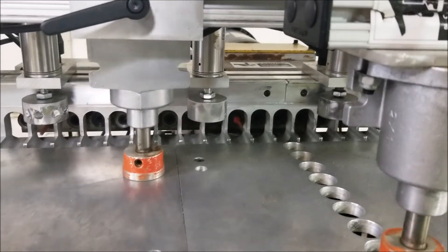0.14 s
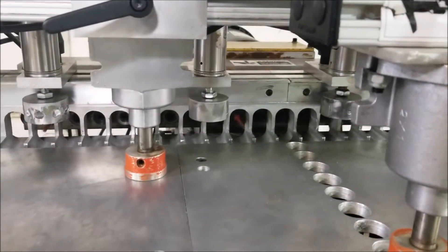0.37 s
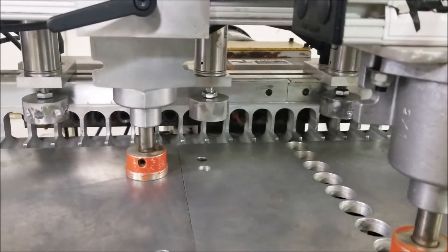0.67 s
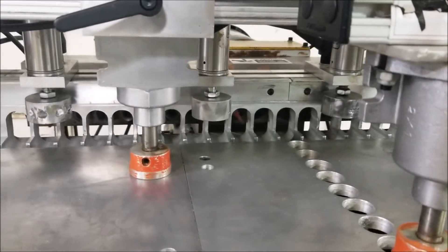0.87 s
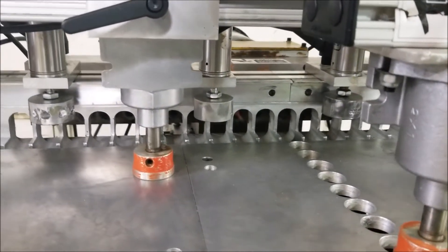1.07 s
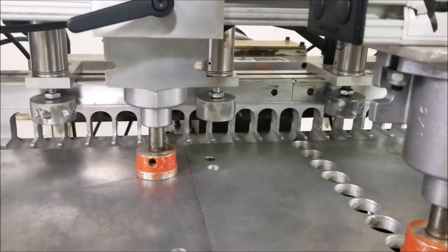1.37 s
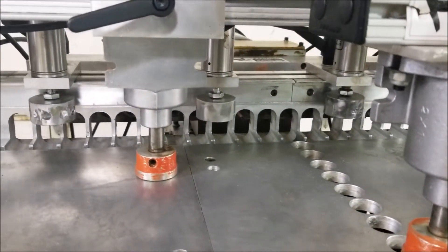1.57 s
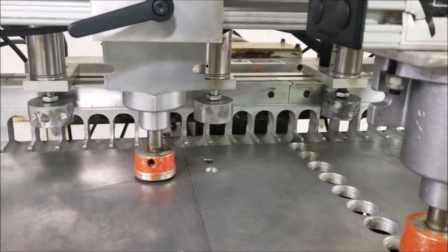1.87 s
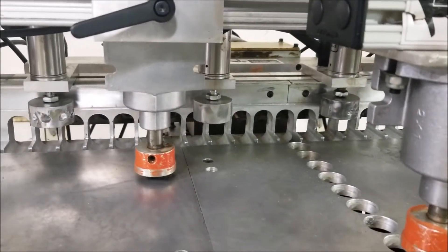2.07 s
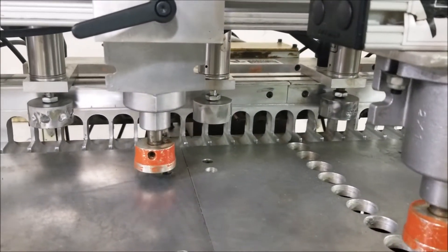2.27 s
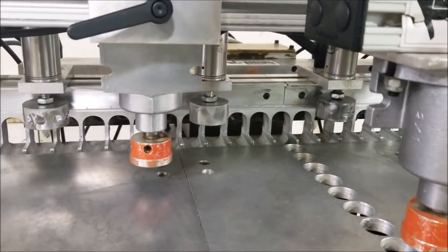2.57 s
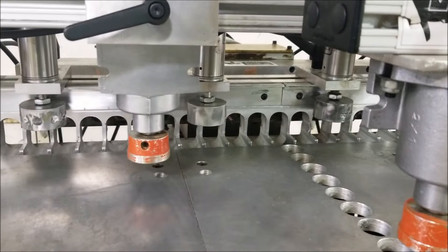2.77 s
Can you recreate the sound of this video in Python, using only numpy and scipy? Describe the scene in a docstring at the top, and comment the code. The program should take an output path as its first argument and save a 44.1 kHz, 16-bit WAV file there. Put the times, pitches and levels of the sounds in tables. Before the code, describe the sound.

Drilling machine roar cuts off with a dull thud, leaving motor hum, fan rush and clicking clamps

```python
"""A boring machine roars under load in a hard-walled workshop, on a left and a right microphone: noise that
partly repeats with the shaft, plus shaft orders. An air jet (coloured noise) and thin metallic chirps (bursts
of narrow noise) lie to the right. The load ends, the roar dies away over a dull thud, the casing rings on
and a wavering motor hum remains over the rush of fans. A valve clicks and a cylinder vents a short hiss
(shaped noise); the clamps knock as they move (damped rings with reflections off the machine's frame)."""
import sys
import numpy as np
from scipy import signal
from scipy.fft import rfft, irfft
from scipy.io import wavfile

SR = 44100
rng = np.random.default_rng(int(sys.argv[2]) if len(sys.argv) > 2 else 0)


def pcm_store(signal):
    """Save signal as 16-bit PCM."""
    levels = np.round(np.clip(np.atleast_2d(signal), -1, 1) * 32767)
    wavfile.write(sys.argv[1], SR, levels.astype(np.int16).T)


N = 129654
TIME = np.arange(N) / SR
BINS = np.maximum(np.arange(N // 2 + 1) * SR / N, 1)  # Hz

# In every table balance_db is left minus right, and density_db (per Hz) gives only the spectrum's shape.

# Roar of the loaded machine
SHAFT_HZ = 29.66  # turns per second
SPEED_WANDER, SPEED_WANDER_HZ = 0.001196, 2.06  # spread as a share of the speed; rate
REPEATING_SHARE = 0.44  # of the roar's noise power, alike every second turn
RIPPLE_DB, RIPPLE_HZ = 1.0, 23  # unevenness of the load
ROAR_LEFT_LATE_S = 0.00014  # the roar reaches the right microphone first
# level of the roar: time_s, level_db
ROAR_LEVEL = [(0, -27.5), (.4, -26.5), (.68, -24.5), (1.05, -24), (1.23, -23.5), (1.38, -28), (1.52, -35),
              (1.65, -48.5), (2.3, -90)]
# colour of the roar: pitch_hz, density_db
ROAR_COLOUR = [(25, -24), (50, -7), (130, -4.5), (240, -5.5), (400, -2.5), (500, -3.5), (680, 4), (840, 1),
               (950, -4), (1250, -4.5), (1700, -1.5), (2300, -6.5), (2900, -13), (3600, -7.5), (5000, -21),
               (7500, -23.5), (9000, -23.5), (16000, -28)]
# direction of the roar: pitch_hz, balance_db
ROAR_DIRECTION = [(100, 3), (300, -8), (500, 0.5), (770, -3), (1170, -2.5), (1790, 5), (3600, 5),
                  (6000, -12.5)]
# strong shaft orders: multiple (of the shaft rate, rounded), level_db (against the roar's noise), balance_db
SHAFT_ORDERS = [(6, -18.5, 5), (10, -17.5, 3), (12, -19.5, -2), (13, -13.5, 1.5), (15, -17.5, -6),
                (16, -16, -6), (18, -15, -4), (21, -16, -10), (24, -16, -2), (26, -12.5, -4),
                (29, -11, -1.5), (36, -17, -4), (48, -14, 7.5), (54, -20, 11), (63.87, -15.5, 18)]
ORDER_FLUTTER, FLUTTER_HZ = 1.1, 9.3  # flutter against the steady partial; rate
# drone at three times the shaft rate: time_s, level_db
DRONE_LEVEL = [(0, -52), (.16, -37.5), (.6, -32.5), (1.1, -32.5), (1.3, -36.5), (1.45, -47), (2, -98)]

# moments when the load grabs and one order booms: peak_s, level_db, multiple (of the shaft rate)
LOAD_SURGES = [(.53, -30.5, 13), (.66, -29.5, 24), (.73, -34.5, 21), (.93, -39, 13), (1.23, -36, 26),
               (1.29, -35.5, 10)]
SURGE_S = 0.035  # standard deviation of the swell

# casing resonances: pitch_hz, width_hz, level_db
CASING_MODES = [(1760, 140, -43.5), (3630, 260, -49.5)]
RING_OUT_S, RING_T60_S = 1.39, 2.24

# level of the air jet: time_s, level_db
JET_LEVEL = [(0, -21), (.04, -24.5), (.16, -30), (.35, -33), (1.18, -36), (1.27, -33.5), (1.38, -39),
             (1.55, -41), (1.75, -49), (2, -56.5), (2.4, -83)]
# colour of the air jet: pitch_hz, density_db
JET_SPECTRUM = [(500, -41), (1500, 0.5), (2400, 9), (3200, 4), (5000, 1), (7600, 0.5), (8500, -7),
                (9800, -1), (12000, -2), (13400, 0), (14100, -7), (15500, -11.5)]
# thin hiss that lingers as the roar dies: time_s, level_db
LAST_AIR_LEVEL = [(1.3, -75), (1.45, -49), (1.62, -43), (1.8, -66), (2.1, -90)]
# colour of that hiss: pitch_hz, density_db
LAST_AIR_SPECTRUM = [(4000, -21), (11000, -3), (15000, -1)]
# direction of all escaping air: pitch_hz, balance_db
AIR_DIRECTION = [(2500, -2), (4500, 0.5), (6500, -7), (8100, -42), (9800, -11.5), (13300, -5.5),
                 (14500, -14)]
JET_TAIL_T60_S, JET_TAIL_DB = 0.068, -7.5  # short, dense noise tail that smears the jet's hiss

# Chirps: centre and width of the band, standard deviation of the swell
CHIRP_HZ, CHIRP_WIDTH_HZ, CHIRP_S = 13330, 400, 0.0014
CHIRP_DB, CHIRP_SPREAD_DB, CHIRP_PAN_DB = -17.5, 3.5, -14  # first is against the roar's level
# the loudest chirps: peak_s, level_db
LOUD_CHIRPS = [(1.172, -32), (1.239, -34), (1.42, -31)]

# clamp knocks: start_s, clack_db (before the clamp band), clack_hz, body_db, clack balance_db, left_late_s
CLAMP_KNOCKS = [(2.2496, -26.5, 1300, -30.5, -5, .00022), (2.358, -26.5, 1330, -34, -2, 0.0012),
                (2.405, -29, 1280, -42, -7, 0.00078), (2.4556, -13, 1180, -37, -4, 0),
                (2.5738, -25.5, 1540, -34, -4, 0.0047), (2.7301, -18, 1390, -25, 11, 0.00045)]
CLACK_T60_S, BODY_HZ, BODY_T60_S = 0.0081, 555, 0.043
KNOCK_LOW_HZ, KNOCK_HIGH_HZ = 795, 1880  # band that the clamps radiate
KNOCK_FRAME_DB, KNOCK_FRAME_T60_S = -5.5, 0.08  # reflections off the machine's frame

# Dull thud as the load ends
THUD_S, THUD_DB, THUD_T60_S = 1.277, -26, 0.13
# colour of the thud: pitch_hz, density_db
THUD_SPECTRUM = [(30, -19), (90, 9), (600, -2), (5000, -55)]

# Cylinder vent: opens, peaks, shuts
VENT_START_S, VENT_PEAK_S, VENT_DB = 2.252, 2.4, -40.5
VENT_RISE_DB_PER_S, VENT_FALL_DB_PER_S = 40, 185
# colour of the vent and the valve: pitch_hz, density_db
VENT_SPECTRUM = [(300, 7), (1500, 6.5), (3000, 2), (6500, -1), (9000, -3.5), (12000, 0.5), (16000, 1)]
# valve clicks: start_s, level_db
VALVE_SPITS = [(2.2492, -30.5), (2.389, -36)]
VALVE_T60_S = 0.018

# main idle tone, which swells and dips: time_s, level_db
WHINE_SWELL = [(0, -50), (1.38, -38.5), (1.53, -35.5), (1.62, -44.5), (1.7, -33), (1.8, -43.5), (1.93, -34),
               (2.03, -43.5), (2.12, -38.5), (2.39, -35.5), (2.42, -43), (2.47, -36.5), (2.7, -34),
               (2.85, -39), (2.94, -32.5)]
WHINE_HZ, WHINE_PAN_DB, WHINE_FLUTTER = 356.2, -8, 0.13
# low idle tone: time_s, level_db
LOW_HUM_SWELL = [(0, -46.5), (1.6, -52), (1.93, -44), (2.04, -45), (2.22, -39), (2.36, -45.5),
                 (2.94, -45.5)]
LOW_HUM_HZ, LOW_HUM_FLUTTER = 140, 0.17
# weaker idle tones: pitch_hz, level_db (before IDLE_SWELL), balance_db, flutter (against the steady partial)
WEAK_HUM = [(279, -47, -4.5, 0.57), (640, -55.5, 8, 0.45), (707, -54.5, -30, 0.48)]
HUM_FLUTTER_HZ = 3.1
# swell shared by the weak tones and the fans: time_s, gain_db
IDLE_SWELL = [(0, -9.5), (1.6, 0), (2.05, -1.5), (2.3, -0.5), (2.6, 1), (2.94, 1)]
FANS_DB = -37  # before IDLE_SWELL
# colour of the fans: pitch_hz, density_db
FANS_COLOUR = [(20, -24), (45, 1.5), (80, 2), (200, -0.5), (350, 1.5), (430, -6.5), (650, -9), (850, -13),
               (1400, -13), (2200, -16), (4200, -19.5), (5200, -27), (7500, -28.5), (9200, -36.5),
               (12500, -35.5), (16000, -35)]
# direction of the fans and the thud: pitch_hz, balance_db
IDLE_DIRECTION = [(100, 1.5), (400, -4), (1000, -2), (2800, 2.5), (4500, 1.5), (8000, -15), (13000, -6)]

# likeness of the left and right microphone signals: pitch_hz, likeness (1 is identical)
MIC_LIKENESS = [(80, 0.96), (200, 0.95), (400, 0.93), (780, 0.53), (1100, 0.043), (3000, 0.013)]
CUTOFF_HZ = 15850


def from_db(db):
    """Decibels to gain."""
    return 10 ** (np.asarray(db) / 20)


def rms_one(x):
    """Scale to unit power."""
    return x / np.sqrt(np.mean(x ** 2) + 1e-20)


def level(rows):
    """Gain over time from time_s, level_db points."""
    return from_db(np.interp(TIME, *np.transpose(rows)))


def over_hz(points):
    """Join pitch_hz, value points on a log-frequency axis."""
    hz, value = np.transpose(points)
    return np.interp(np.log(BINS), np.log(hz), value)


def pan(db):
    """Left and right gains of constant power."""
    gains = from_db(np.array([[.5], [-.5]]) * db)
    return gains / np.sqrt(np.mean(gains ** 2, axis=0))


def drift(rate):
    """Slow chance with spread 1: noise through a double low-pass at the rate in Hz."""
    r = np.exp(-200 * np.pi * rate / SR)
    # one value per 100 samples; the first 1000 let the filter settle
    steps = rng.standard_normal(N // 100 + 1002)
    slow = signal.lfilter([1], [1, -2 * r, r * r], steps)[1000:]
    return np.interp(np.arange(N) / 100, np.arange(len(slow)), rms_one(slow))


def white():
    """Two unrelated noises."""
    return rng.standard_normal((2, N))


def coloured(source, colour, balance):
    """Give two unrelated signals a spectrum, a likeness and a direction; unit power."""
    mid, side = rfft(source)
    alike = np.clip(over_hz(MIC_LIKENESS), -.99, .99)
    both = np.sqrt(1 + alike) * mid + np.sqrt(1 - alike) * side * [[1], [-1]]
    return rms_one(irfft(both * from_db(over_hz(colour)) * pan(over_hz(balance)), N))


def tone(cycles, hz, flutter, rate):
    """A partial fluttering in strength and phase; higher ones reach the microphones less alike."""
    alike = np.clip(np.interp(hz, *np.transpose(MIC_LIKENESS)), -1, 1)
    apart = np.arccos(alike) * rng.choice([-.5, .5])
    phase = 2 * np.pi * (cycles + rng.random()) + apart * np.array([[1], [-1]])
    in_phase = (1 + flutter * drift(rate)) * np.cos(phase)
    quadrature = flutter * drift(rate) * np.sin(phase)
    return rms_one(in_phase + quadrature)


def decay(start, t60):
    """A sudden start and an exponential fall."""
    return (TIME >= start) * from_db(-60 * np.clip((TIME - start) / t60, 0, 4))


def ring(start, hz, t60):
    """One struck mode: a decaying sine."""
    return decay(start, t60) * -np.sin(2 * np.pi * hz * (TIME - start))


def add_tail(x, db, t60):
    """Add a short, dense tail by convolving with decaying noise."""
    size = SR // 4
    tail = rms_one((white() * decay(.0005, t60))[:, :size]) / np.sqrt(size)
    return x + from_db(db) * signal.fftconvolve(x, tail, axes=1)[:, :N]


def roar(turns):
    """Rattle that repeats every second turn, turbulent noise, strong shaft orders and the low drone."""
    size = int(2 * SR / SHAFT_HZ)  # samples in two turns
    place = (turns / 2 % 1) * size
    patterns = rng.standard_normal((2, size))
    repeating = np.array([rms_one(np.interp(place, np.arange(size), p)) for p in patterns])
    share = np.clip(REPEATING_SHARE, 0, 1)
    noise = np.sqrt(share) * repeating + np.sqrt(1 - share) * white()
    loaded = coloured(noise, ROAR_COLOUR, ROAR_DIRECTION)
    for multiple, db, pan_db in SHAFT_ORDERS:
        k = round(multiple)
        order = tone(k * turns, k * SHAFT_HZ, ORDER_FLUTTER, FLUTTER_HZ)
        loaded = loaded + from_db(db) * pan(pan_db) * order
    ripple = from_db(RIPPLE_DB * drift(RIPPLE_HZ))
    drone = tone(3 * turns, 3 * SHAFT_HZ, .08, FLUTTER_HZ)
    return level(ROAR_LEVEL) * ripple * loaded + level(DRONE_LEVEL) * drone


def surges(turns):
    """Single shaft orders boom for a moment, which makes the roar lumpy."""
    out = 0
    for s, db, k in LOAD_SURGES:
        swell = from_db(db) * np.exp(-.5 * ((TIME - s) / SURGE_S) ** 2)
        out = out + swell * tone(round(k) * turns, k * SHAFT_HZ, 0.2, FLUTTER_HZ)
    return out


def casing():
    """The load shakes narrow casing resonances (filtered noise), which ring on as the roar dies."""
    fade = from_db(-60 * np.maximum(TIME - RING_OUT_S, 0) / RING_T60_S)
    rings = 0
    for hz, width, db in CASING_MODES:
        resonance = 1 / (1 + ((BINS - hz) * 2 / width) ** 2)
        rings = rings + from_db(db) * rms_one(irfft(rfft(white()) * resonance, N))
    return fade * rings


def air_jet():
    """A bright noise jet on the right, strongest at first, thinning to a faint hiss as the roar fades."""
    hiss = coloured(white(), JET_SPECTRUM, AIR_DIRECTION)
    jet = level(JET_LEVEL) * rms_one(add_tail(hiss, JET_TAIL_DB, JET_TAIL_T60_S))
    return jet + level(LAST_AIR_LEVEL) * coloured(white(), LAST_AIR_SPECTRUM, AIR_DIRECTION)


def chirps(turns):
    """Narrow noise swells three times a turn, as loud as load and chance make it, plus a few loud ones."""
    touches = np.flatnonzero(np.diff(np.floor(3 * turns)) > 0)
    chance = np.clip(rng.standard_normal(len(touches)), -2, 2)
    hits = np.zeros(N)
    hits[touches] = level(ROAR_LEVEL)[touches] * from_db(CHIRP_DB + CHIRP_SPREAD_DB * chance)
    for s, db in LOUD_CHIRPS:
        hits[int(s * SR)] = from_db(db)
    swell = signal.fftconvolve(hits, signal.windows.gaussian(SR // 50, CHIRP_S * SR), "same")
    band = np.exp(-2 * ((BINS - CHIRP_HZ) / CHIRP_WIDTH_HZ) ** 2)
    squeal = irfft(rfft(white()[0]) * band, N)
    return pan(CHIRP_PAN_DB) * swell * rms_one(squeal)


def knocks():
    """Each clamp knock is a damped clack over a longer, low body ring, then reflections from the frame."""
    clacks, bodies = 0, 0
    for s, db, hz, body_db, pan_db, late in CLAMP_KNOCKS:
        start = s + late * np.array([[.5], [-.5]])
        clacks = clacks + from_db(db) * pan(pan_db) * ring(start, hz, CLACK_T60_S)
        bodies = bodies + from_db(body_db) * ring(start, BODY_HZ, BODY_T60_S)
    clamp_band = signal.butter(2, [KNOCK_LOW_HZ, KNOCK_HIGH_HZ], "band", fs=SR, output="sos")
    clacks = signal.sosfilt(clamp_band, clacks)
    return add_tail(clacks + bodies, KNOCK_FRAME_DB, KNOCK_FRAME_T60_S)


def thud():
    """The heavy body shudders briefly: a decaying burst of low noise."""
    return from_db(THUD_DB) * decay(THUD_S, THUD_T60_S) * coloured(white(), THUD_SPECTRUM, IDLE_DIRECTION)


def vent():
    """The valve spits short noise bursts, and the exhaust hiss swells and shuts off."""
    late = TIME - VENT_PEAK_S
    slope_db = np.minimum(VENT_RISE_DB_PER_S * late, -VENT_FALL_DB_PER_S * late)
    flow = (TIME > VENT_START_S) * from_db(VENT_DB + slope_db)
    spits = sum(from_db(db) * decay(s, VALVE_T60_S) for s, db in VALVE_SPITS)
    return (flow + spits) * coloured(white(), VENT_SPECTRUM, AIR_DIRECTION)


def idle():
    """Two swelling motor tones and weaker fluttering ones over the rush of fans, which is noise."""
    whine = tone(WHINE_HZ * TIME, WHINE_HZ, WHINE_FLUTTER, HUM_FLUTTER_HZ)
    whine = level(WHINE_SWELL) * pan(WHINE_PAN_DB) * whine
    low = level(LOW_HUM_SWELL) * tone(LOW_HUM_HZ * TIME, LOW_HUM_HZ, LOW_HUM_FLUTTER, HUM_FLUTTER_HZ)
    hum = 0
    for hz, db, pan_db, flutter in WEAK_HUM:
        hum = hum + from_db(db) * pan(pan_db) * tone(hz * TIME, hz, flutter, HUM_FLUTTER_HZ)
    fans = from_db(FANS_DB) * coloured(white(), FANS_COLOUR, IDLE_DIRECTION)
    return whine + low + level(IDLE_SWELL) * (hum + fans)


def scene():
    """The loaded machine, its air and clamps, and the idle hum behind."""
    turns = np.cumsum(SHAFT_HZ * (1 + SPEED_WANDER * drift(SPEED_WANDER_HZ))) / SR
    left, right = roar(turns) + surges(turns)
    loaded = np.array([np.interp(TIME - ROAR_LEFT_LATE_S, TIME, left), right])
    machine = loaded + casing() + air_jet() + chirps(turns)
    return machine + knocks() + thud() + vent() + idle()


def record(dry):
    """A steep elliptic low-pass cuts the top."""
    return signal.sosfilt(signal.ellip(12, .2, 80, CUTOFF_HZ, fs=SR, output="sos"), dry)


dry = scene()
out = record(dry)
pcm_store(out)
```